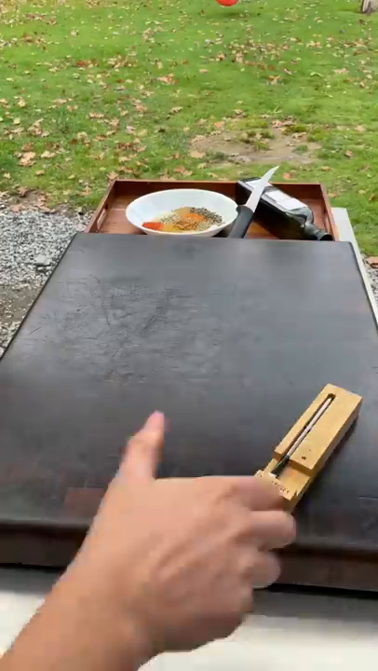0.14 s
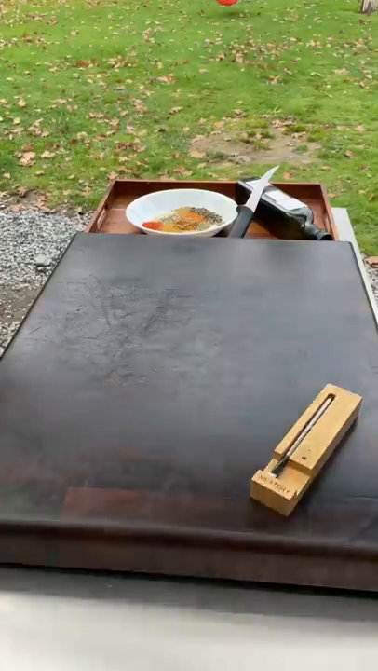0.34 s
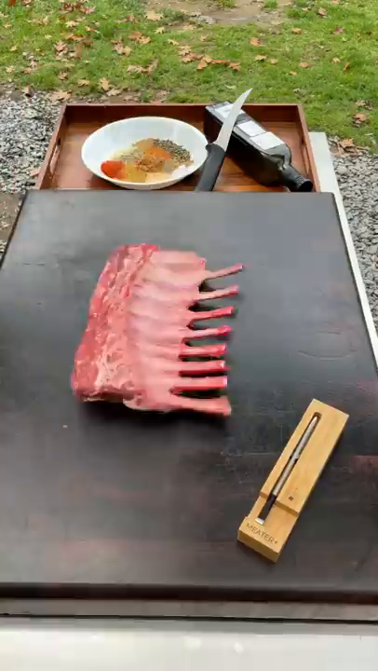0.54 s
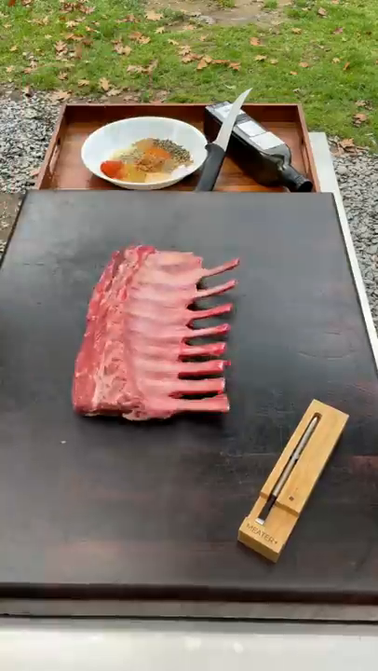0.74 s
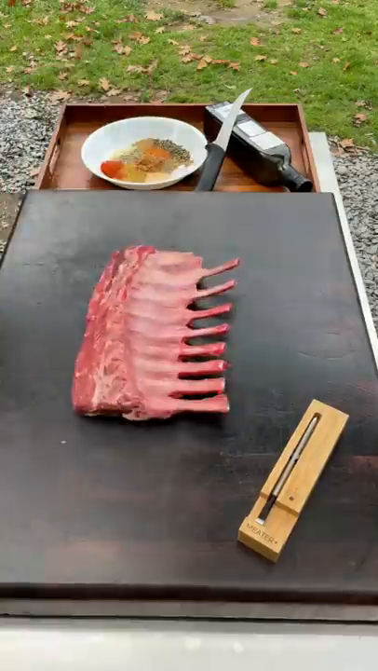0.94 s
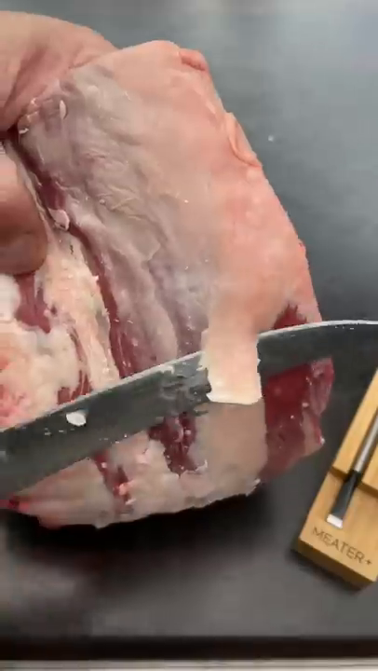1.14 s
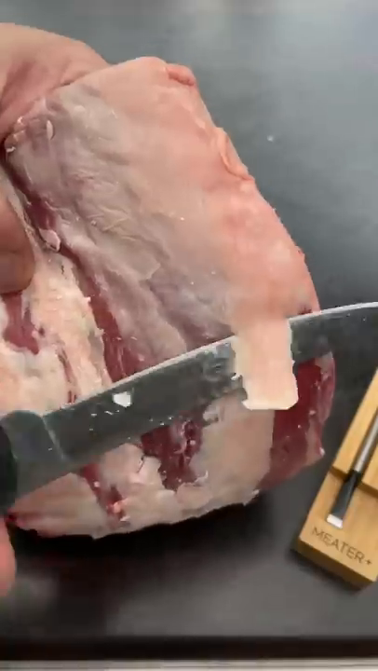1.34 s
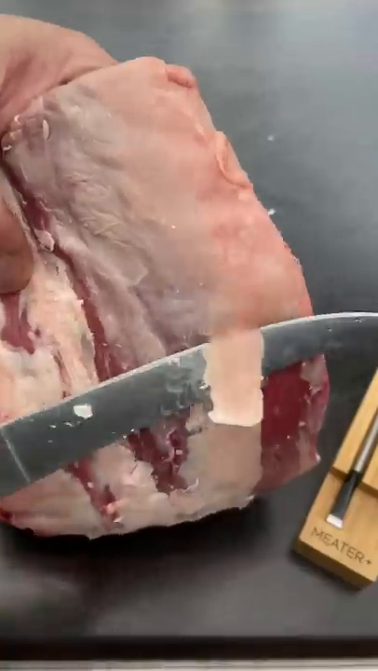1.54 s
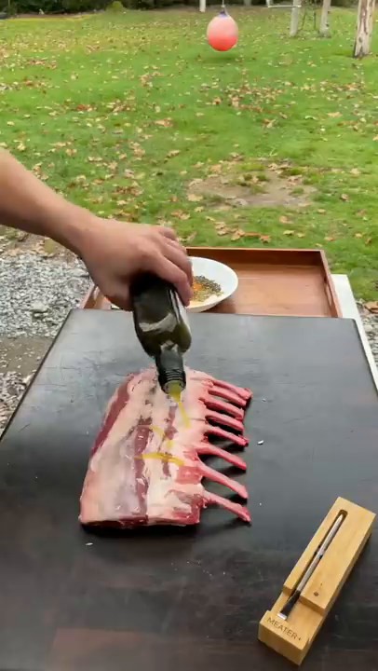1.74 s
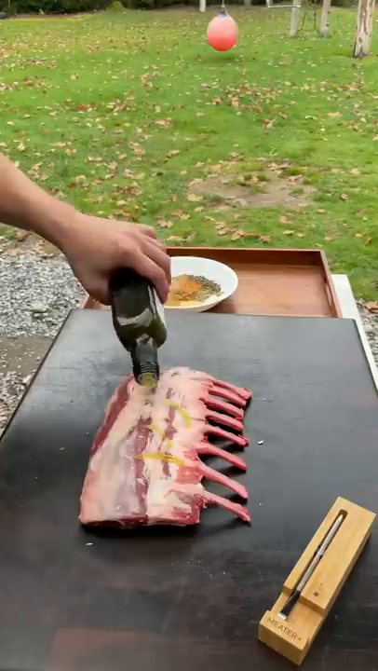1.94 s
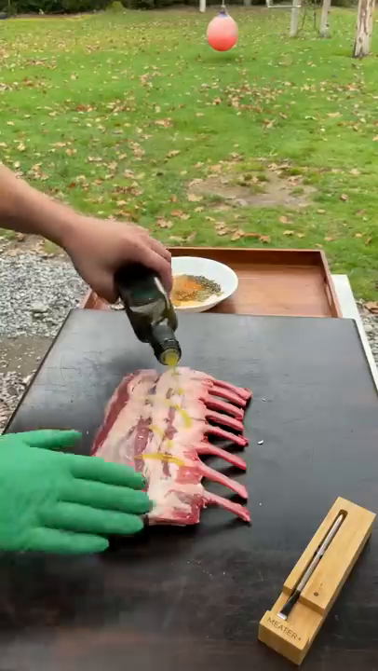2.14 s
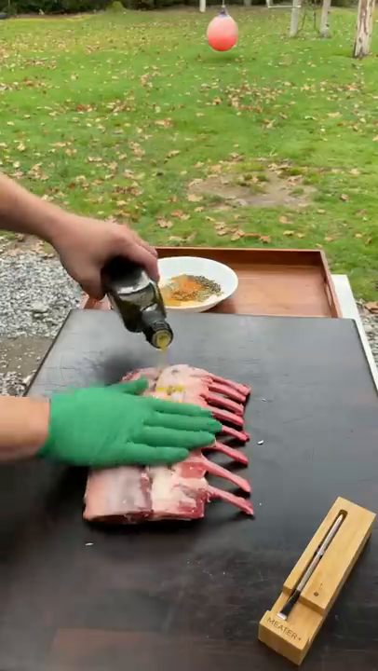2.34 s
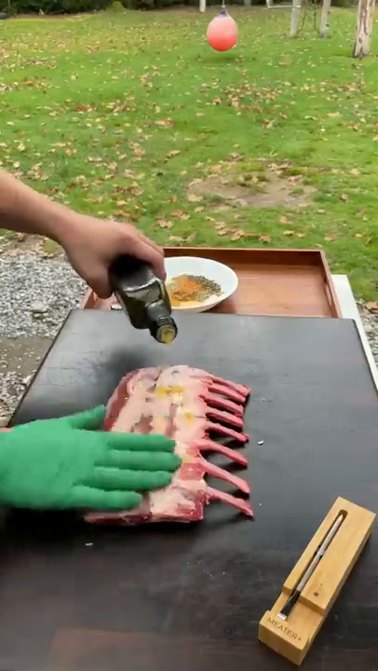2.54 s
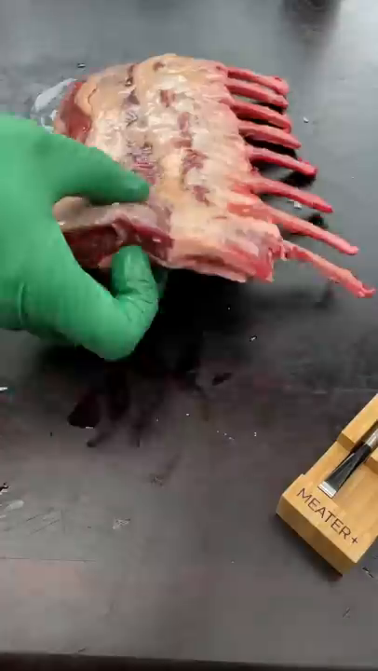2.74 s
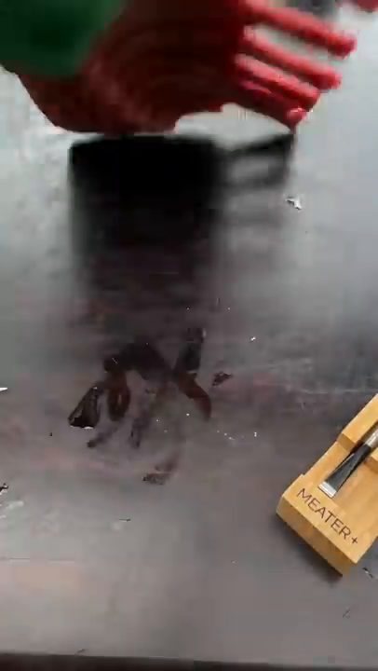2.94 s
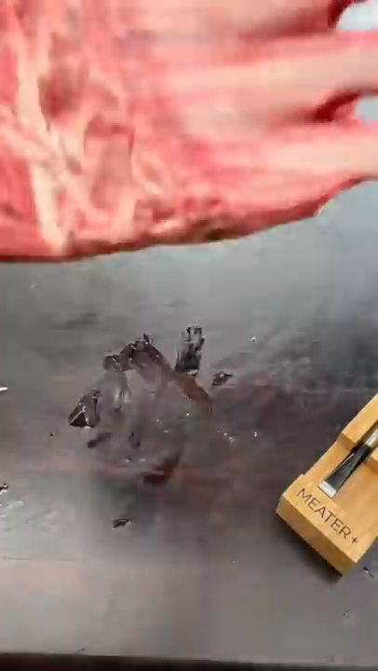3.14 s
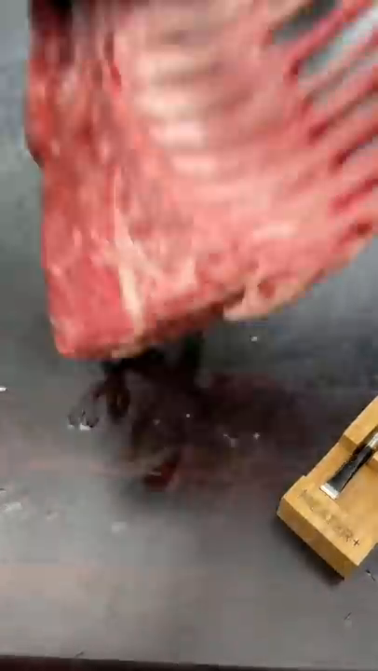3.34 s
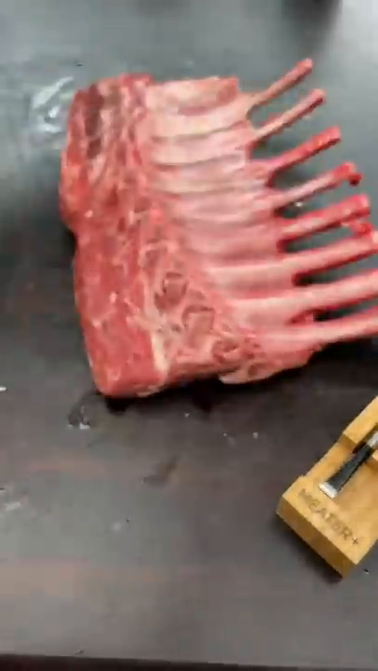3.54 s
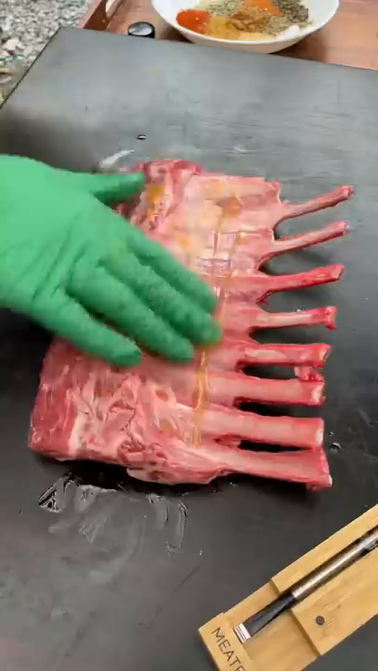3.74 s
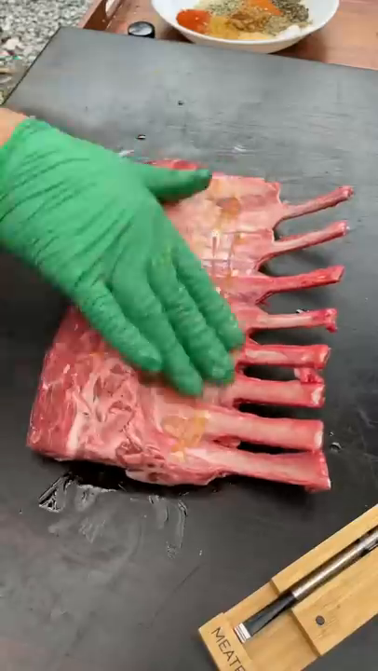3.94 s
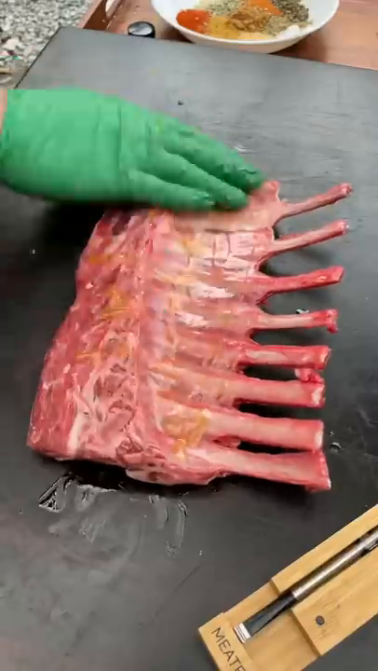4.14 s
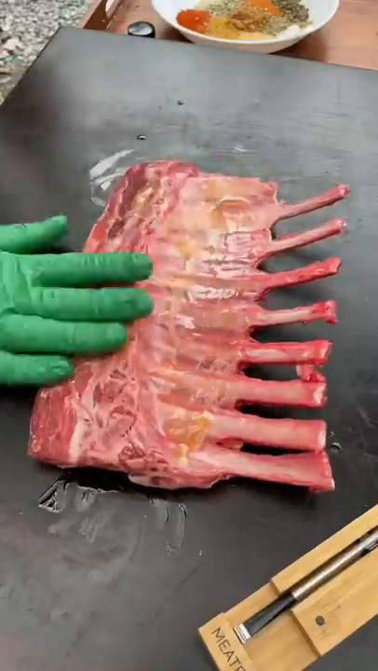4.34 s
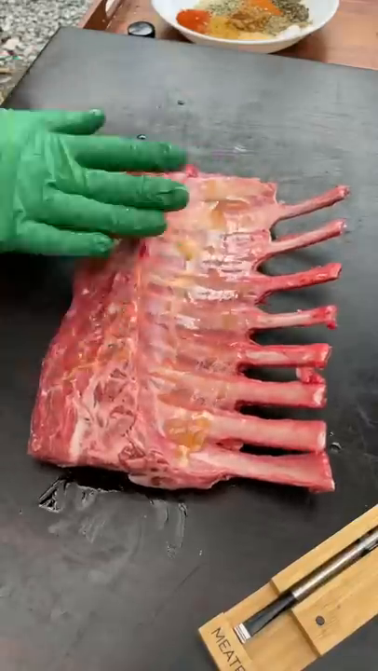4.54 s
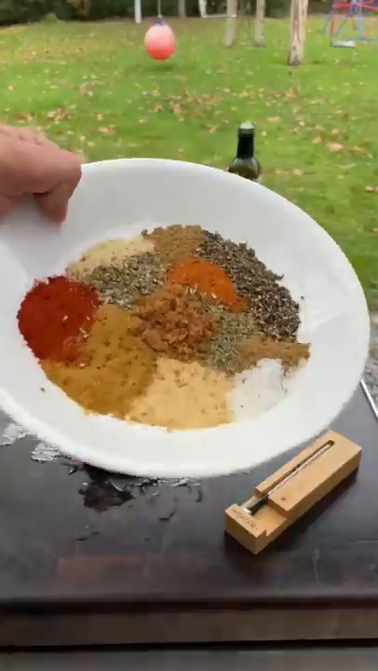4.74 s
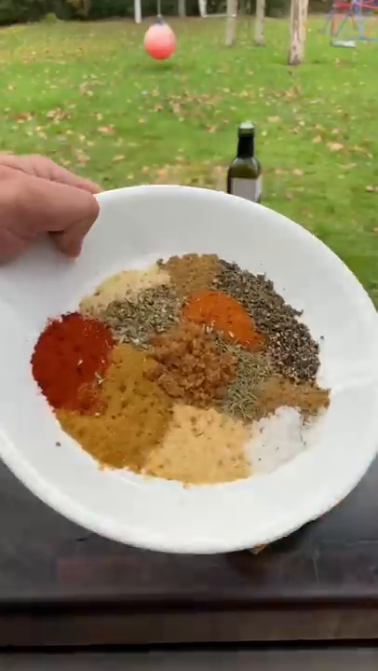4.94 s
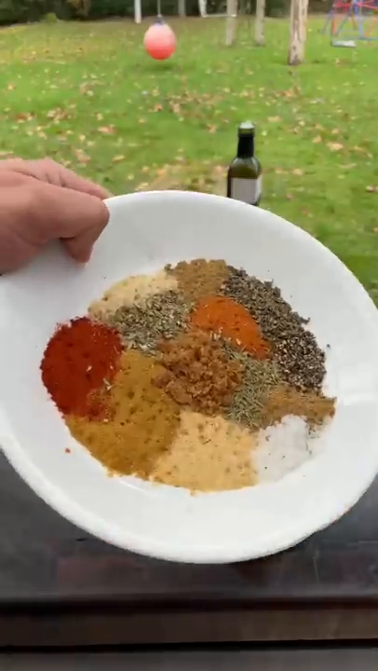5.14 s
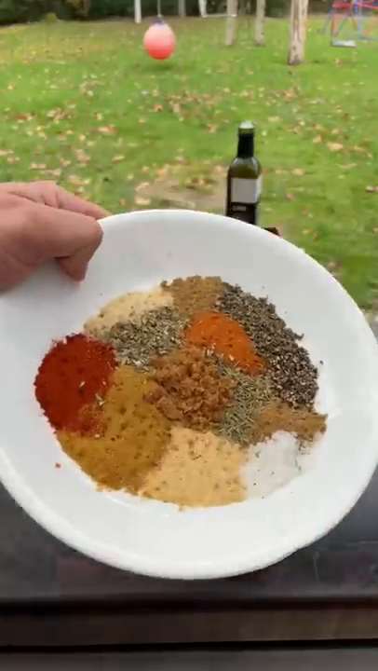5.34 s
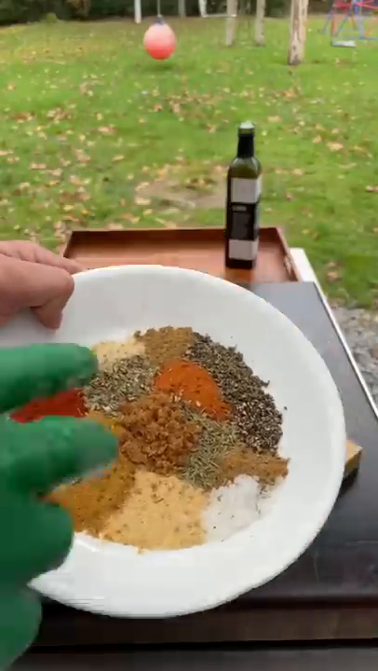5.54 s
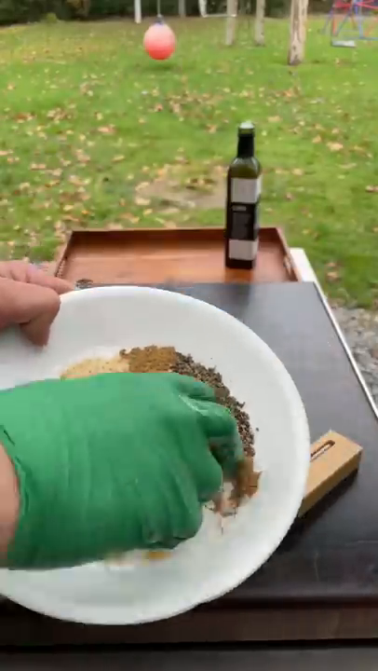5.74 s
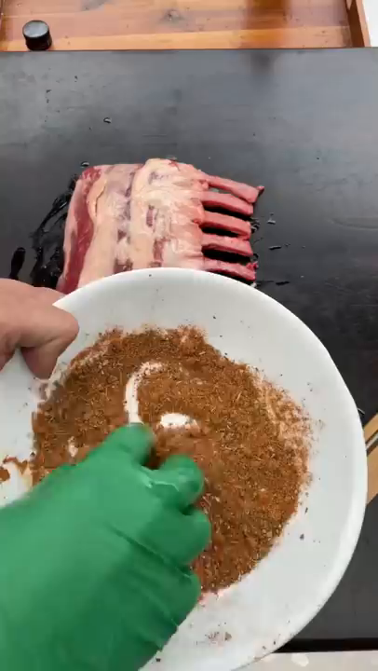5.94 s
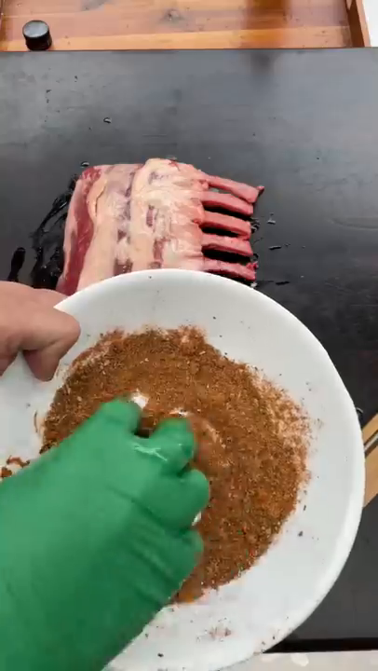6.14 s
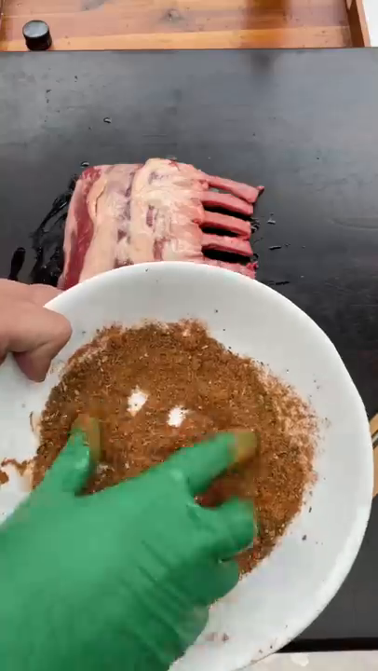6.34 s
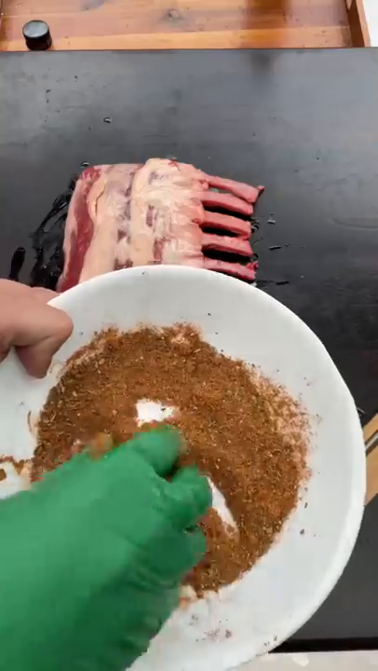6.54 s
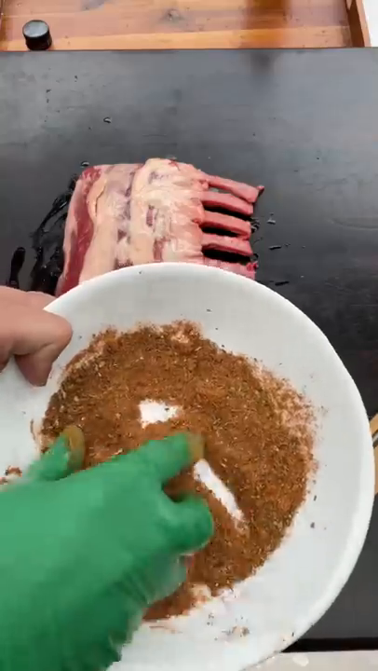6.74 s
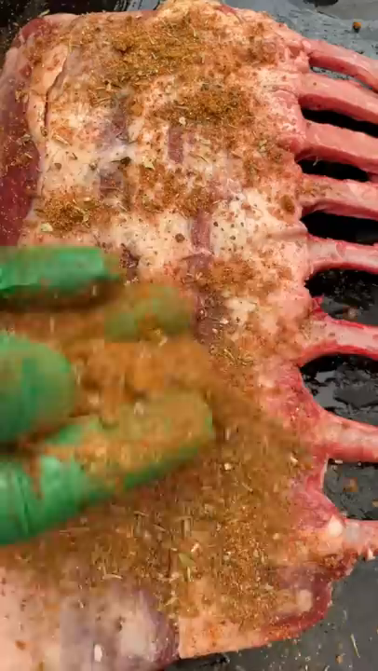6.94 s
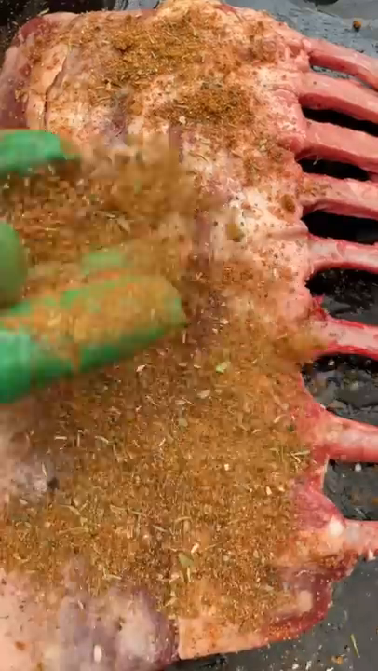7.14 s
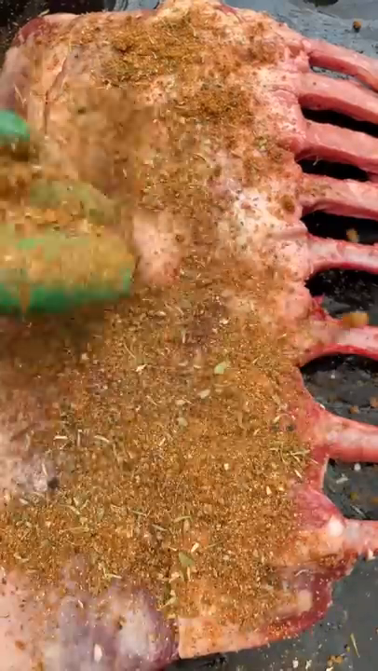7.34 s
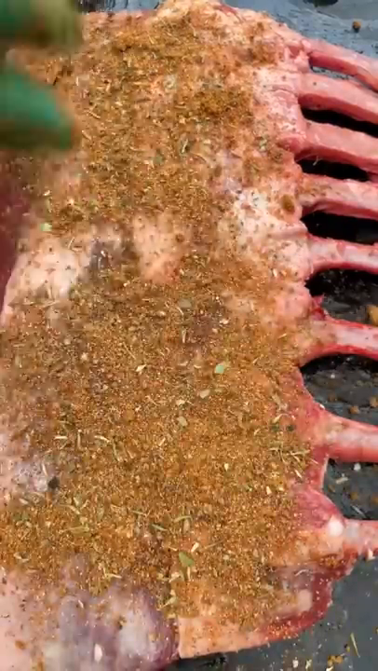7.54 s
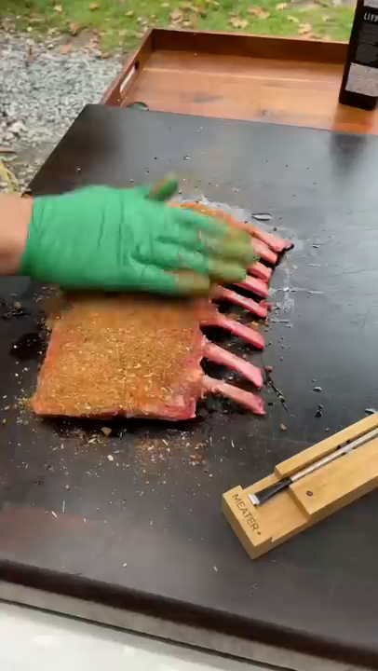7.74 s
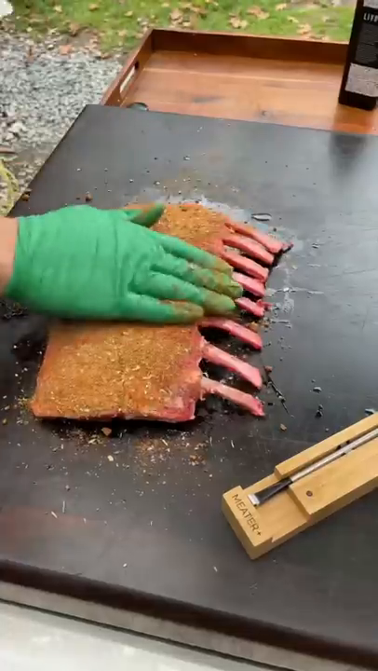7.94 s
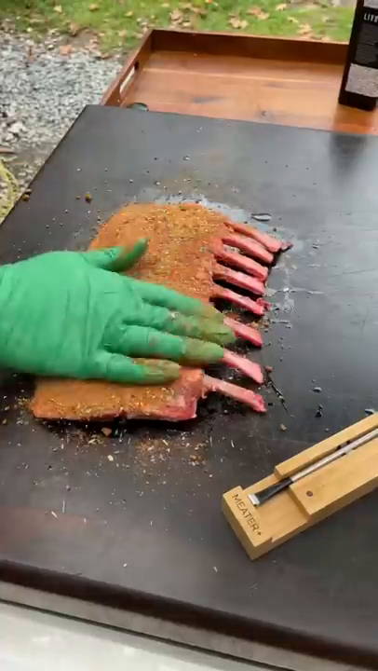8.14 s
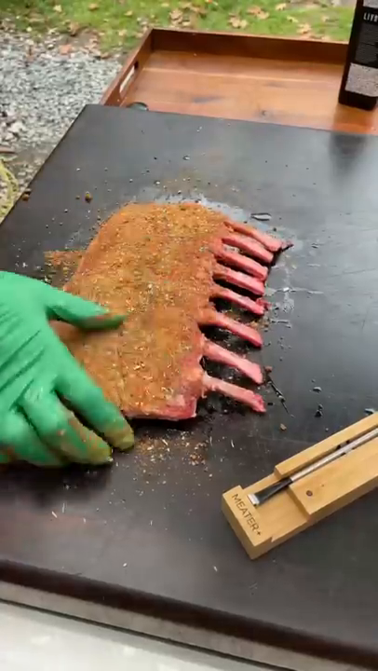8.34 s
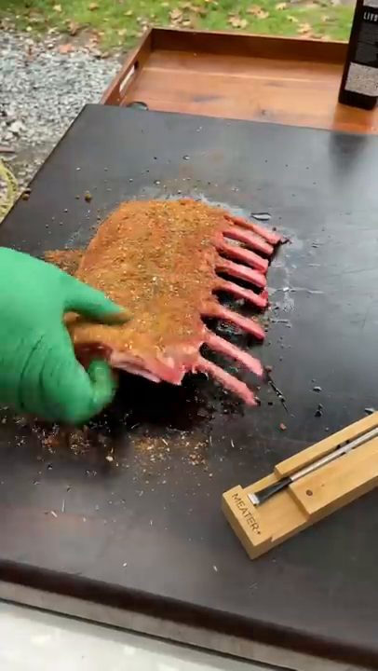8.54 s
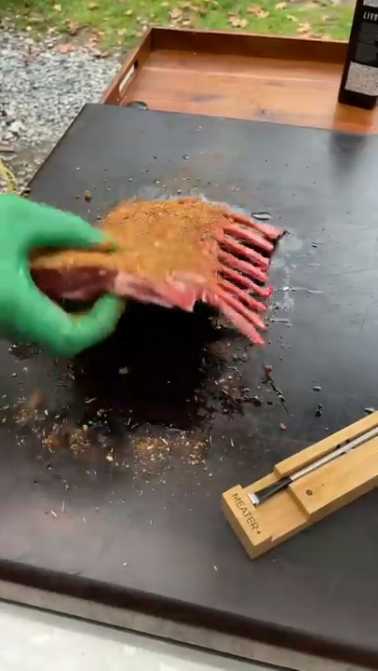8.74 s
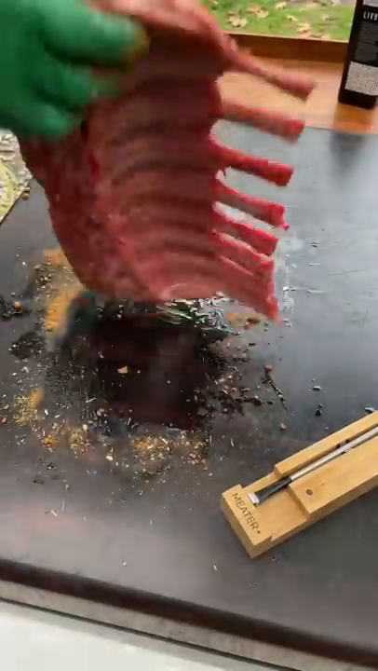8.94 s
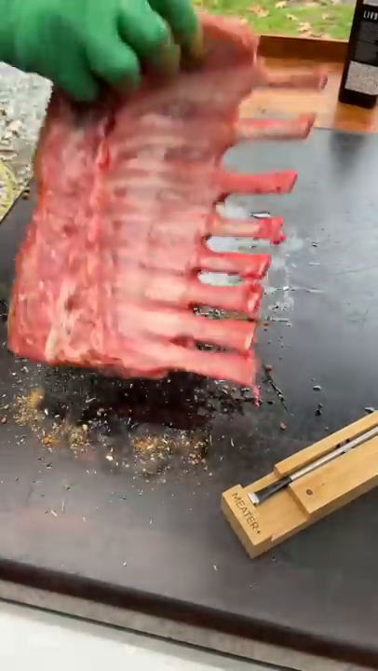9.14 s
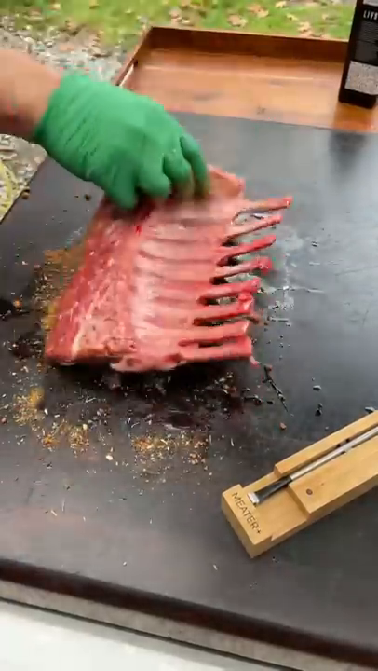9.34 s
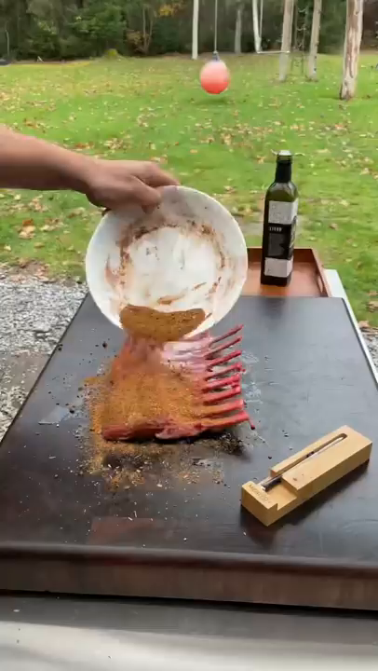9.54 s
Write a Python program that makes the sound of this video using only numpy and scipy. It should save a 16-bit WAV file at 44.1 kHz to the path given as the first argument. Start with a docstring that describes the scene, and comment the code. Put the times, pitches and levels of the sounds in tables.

```python
"""Outdoors, at a heavy wooden board on a steel table, a rack of lamb is seasoned close to two microphone ports.
Meat is slapped down, oiled, peeled off and turned: blows ring the board and table, which rattle and rock.
A gloved hand stirs dry spice in a plate, sprinkles it and pats it in: wet and dry friction is built from tiny
random clicks through resonances and filters, the garden air from shaped noise.
The scene has twelve sections; the background level changes at each, and ringing stops abruptly."""
import sys
import numpy as np
from scipy import signal
from scipy.fft import rfft, irfft, next_fast_len
from scipy.io import wavfile
from scipy.ndimage import uniform_filter1d, map_coordinates

SR = 44100
rng = np.random.default_rng(int(sys.argv[2]) if len(sys.argv) > 2 else 0)


def generate_wav(signal):
    """Clip the signal to [-1, 1] and save it as 16-bit WAV at the path in sys.argv[1]."""
    frames = np.transpose(np.atleast_2d(signal))
    scaled = np.clip(frames, -1, 1) * 32767
    pcm = np.round(scaled).astype(np.int16)
    wavfile.write(sys.argv[1], SR, pcm)


N = 427769
TIME = np.arange(N) / SR
RING_TIME = TIME[:SR // 2]  # single hits last half a second at most
# Table levels are relative: the functions trim them with their own *_db settings.


def undb(db):
    """Decibels to gain."""
    return 10 ** (np.asarray(db) / 20)


def unit(x):
    """Scale to rms 1."""
    return x / np.sqrt(np.mean(x ** 2))


def fade(t, t60):
    """Exponential decay by 60 dB in t60 seconds."""
    return np.exp(-np.log(1000) * t / max(t60, 1e-4))


def convolve(x, response):
    """Filter x, keeping its length."""
    return signal.fftconvolve(x, response)[:len(x)]


def spectrum_at(hz, points):
    """Read (freq_hz, level_db) points on a log-frequency axis."""
    f, db = np.transpose(points)
    return np.interp(np.log(hz + 1), np.log(f), db)


def colour(x, points, size=4096):
    """Causal minimum-phase filter with the given spectrum shape; white noise keeps its power."""
    log_gain = np.log(undb(spectrum_at(np.fft.rfftfreq(size, 1 / SR), points)))
    cepstrum = irfft(log_gain)
    # folding the cepstrum puts the energy as early as possible
    cepstrum[1:size // 2] *= 2
    cepstrum[size // 2 + 1:] = 0
    response = irfft(np.exp(rfft(cepstrum)))
    return convolve(x, response / np.linalg.norm(response))


MOST_CYCLES = 48  # longest t60 of any struck mode, in cycles


def ring(modes, contact_hz=np.inf):
    """Damped modes after one blow; meat and hand cap every decay, and a soft contact weakens high modes."""
    total = 0
    for hz, t60, db in modes:
        gain = undb(db) / (1 + (hz / contact_hz) ** 2)
        decay = fade(RING_TIME, min(t60, MOST_CYCLES / hz))
        total = total + gain * decay * np.sin(2 * np.pi * hz * RING_TIME)
    return total


def burst(points, t60, rise_s=0):
    """A coloured noise burst that swells briefly and dies away."""
    swell = 1 - np.exp(-RING_TIME / max(rise_s, 1e-6))
    noise = rng.standard_normal(len(RING_TIME))
    return colour(noise * swell * fade(RING_TIME, t60), points)


def walk(rate):
    """Smooth random wandering, rms near 1, with about `rate` new values a second."""
    hold = int(SR / rate)
    stairs = np.repeat(rng.standard_normal(N // hold + 1), hold)
    return unit(uniform_filter1d(stairs, hold)[:N])


def grains(per_s, spread_db):
    """Random tiny clicks of uneven size and either sign, rms 1."""
    sizes = undb(spread_db * np.minimum(rng.standard_normal(N), 2.5))
    happens = rng.random(N) < per_s / SR
    return unit(happens * sizes * rng.choice([-1, 1], N))


# when each section of the scene begins: start_s
SECTION_STARTS = [0, .985, 1.63, 2.25, 3.0, 3.638, 4.66, 5.36, 5.96, 6.885, 7.685, 9.55]


def section_end(s):
    """When the section that contains time s ends."""
    return min([start for start in SECTION_STARTS if start > s] + [N / SR])


def add(out, start_s, sound):
    """Mix a sound in; it stops when the next section begins."""
    first = max(int(start_s * SR), 0)
    count = min(len(sound), int(section_end(start_s) * SR) - first, N - first)
    out[first:first + count] += sound[:count]


def strokes(rows, attack_s, release_t60, axis=2):
    """Gain of a series of strokes: each swells, holds until its length is up and dies away; powers add."""
    power, t = np.zeros(N), TIME[:SR]
    for row in rows:
        start_s, length_s = row[:2]
        shape = np.minimum(t / attack_s, 1) * fade(np.maximum(t - length_s, 0), release_t60)
        add(power, start_s, (undb(row[axis]) * shape) ** 2)
    return np.sqrt(power)


def glide(x, ratio):
    """Shift all resonances of a steady texture by a moving frequency ratio, by reading it at varying speed."""
    return map_coordinates(x, [np.cumsum(ratio) % (N - 1)], order=1)


def pitch_path(rows):
    """Pitch over time for strokes whose last two columns are from_hz and to_hz."""
    path = []
    for s, length_s, *_, from_hz, to_hz in rows:
        path += [(s, from_hz), (s + length_s, to_hz)]
    return np.interp(TIME, *np.transpose(sorted(path)))


# the two microphone ports: freq_hz, left_lead_rad
PORT_PHASE = [(0, 0), (1000, -.2), (2700, .4), (5300, 0), (6500, .9), (8350, 2.7), (10300, 3.14),
              (12000, 4.1), (14000, 5.9), (16000, 6.28)]
# the same ports: freq_hz, left_minus_right_db
PORT_BALANCE = [(60, 0.4), (250, 1.5), (500, 5.5), (1000, 3), (2000, 0), (4000, 0), (10000, -0.5)]


def ports(x):
    """Spread a mono sound over two microphone ports that differ in phase and level."""
    size = next_fast_len(N + SR)
    hz = np.fft.rfftfreq(size, 1 / SR)
    lead = np.exp(1j * np.interp(hz, *np.transpose(PORT_PHASE)))
    tilt = undb(spectrum_at(hz, PORT_BALANCE) / 2)
    return irfft(rfft(x, size) * np.array([lead * tilt, 1 / tilt]), size)[:, :N]


# background in each section: air_db, hiss_db
SECTION_LEVELS = [(-61.5, -80), (-63, -63.5), (-60, -65), (-62.5, -72.5), (-69.5, -87), (-68.5, -82),
                  (-73, -88), (-68, -73.5), (-70.5, -78), (-73.5, -88), (-66.5, -78.5), (-76.5, -88)]
# colour of the garden air: freq_hz, level_db
AIR = [(25, -11), (60, 6), (120, -0.5), (300, -8), (700, -15), (1200, -20.5), (3000, -29.5), (8000, -50.5),
       (16000, -57.5)]
# colour of the soft hiss: freq_hz, level_db
HISS = [(200, -16.5), (900, -3), (1500, -6), (2500, -0.5), (4500, -4.5), (7000, -4), (12000, -6.5),
        (16000, -17.5)]
# colour of what differs between the ports: freq_hz, level_db
NEARBY = [(40, -24), (200, -4), (650, 6), (1800, -1.5), (3200, -1), (7000, -6.5), (10000, -15.5),
          (13000, -12), (16000, -16)]
HUM_HZ, HUM_DB, HUM_STOPS_S = 57.5, -57.5, 3.638


def outdoors(apart_db=-3, waver_db=1):
    """Garden air and soft hiss as noise, levelled per section; a low, drifting hum under the first sections."""
    section = np.searchsorted(SECTION_STARTS, TIME, side="right") - 1
    air_gain, hiss_gain = (uniform_filter1d(undb(db)[section], size=512) for db in np.transpose(SECTION_LEVELS))
    hum_phase = 2 * np.pi * np.cumsum(HUM_HZ + .5 * walk(rate=9.1)) / SR
    hum = undb(HUM_DB) * (TIME < HUM_STOPS_S) * np.sqrt(2) * np.sin(hum_phase)

    def background():
        """One independent draw of air and hiss."""
        air = air_gain * colour(rng.standard_normal(N), AIR)
        return air + hiss_gain * colour(rng.standard_normal(N), HISS)

    shared, left, right = (background() for _ in range(3))
    apart = np.array([colour(left, NEARBY), colour(right, NEARBY)])
    waver = undb(waver_db * walk(rate=10.0))
    return hum + (ports(shared) + undb(apart_db) * apart) * waver


# meat or hand strikes the board: start_s, knock_db, boom_db, smack_db, thud_db
BLOWS = [(0.001, -33.5, -40, -28.5, -44), (0.41, -55, -43.5, -87, -56), (0.5141, -14, -29, -17.5, -22),
         (0.5197, -9, -36, -31, -13.5), (0.5409, -2, -23.5, -21, -20.5), (0.577, -22, -50, -44, -21.5),
         (0.593, -36, -19, -48, -45), (0.625, -37, -36.5, -60, -30.5), (3.408, -17, -28.5, -15, -20),
         (3.43, -28, -41, -26, -25), (3.466, -24, -27, -38, -22.5), (3.517, -37, -33, -49, -33),
         (3.568, -33, -29.5, -48, -31.5), (4.568, -65, -50, -94, -62), (5.36, -69, -55.5, -85, -68.5),
         (7.7877, -56.5, -56.5, -36, -51.5), (7.792, -41.5, -46, -35, -36.5), (7.842, -66, -41, -37, -54),
         (8.069, -57.5, -55, -34, -54), (8.076, -54, -44, -36.5, -47), (9.249, -29.5, -51.5, -50, -59),
         (9.422, -44, -60, -53, -60)]
# modes of the board: freq_hz, t60_s (before the cap), level_db
BOARD = [(249, .08, -19.5), (366, 0.19, -16.5), (441, 0.14, -13.5), (511, 0.1, -15.5), (670.4, 0.049, -0.5),
         (725, 0.05, -15), (915, .1, -16.5), (1163, 0.05, -9.5), (1210, 0.04, -5.5), (1297, 0.03, -13.5),
         (1657, 0.034, -13.5), (1965, 0.035, -5), (2040, 0.024, -7), (2420, 0.02, -15), (3000, 0.02, -13.5)]
# modes of the table under it: freq_hz, t60_s (before the cap), level_db
TABLE = [(57, 0.63, -11.5), (81.4, 0.22, -2), (90, 0.19, -1), (142.6, 0.13, -2.5), (236.4, 0.44, -10)]
# colour of the wet smack: freq_hz, level_db
SMACK = [(200, -13), (1200, 0.5), (2000, 5), (3000, 1.5), (5000, -5), (6500, -4), (12000, -5.5),
         (16000, -20)]
# colour of the fleshy thud: freq_hz, level_db
FLESH = [(60, -10.5), (130, -4.5), (240, 0), (470, 1.5), (700, 0.5), (950, 0), (1600, -10), (3000, -23.5),
         (8000, -42.5)]


def blows(knock_db=0, boom_db=2, smack_db=9, smack_t60=0.017, spread_at_0db_s=0.00037, slowing=0.39,
          thud_db=0, thud_t60=0.092, push_s=.005, contact_hz=2100, build_s=0.0015):
    """Blows smack wetly as contact spreads, thud in flesh, build up the board's ring and, slower, a table boom."""
    out = np.zeros(N)
    boom = ring(TABLE) * (1 - np.exp(-RING_TIME / push_s))
    for s, knock, low, smack, thud in BLOWS:
        spread_s = spread_at_0db_s * undb(-slowing * knock)  # a gentle blow flattens the meat more slowly
        wood = ring(BOARD, contact_hz) * (1 - np.exp(-RING_TIME / (spread_s + build_s)))
        wood = wood / np.abs(wood).max()
        wet = undb(smack + smack_db) * burst(SMACK, smack_t60, spread_s)
        flesh = undb(thud + thud_db) * burst(FLESH, thud_t60, build_s)
        add(out, s, undb(knock + knock_db) * wood + undb(low + boom_db) * boom + wet + flesh)
    return out


# loose things shake: start_s, clatter_db, clatter_t60_s, jingle_db, jingle_t60_s, board_ring_db
SHAKES = [(.001, -46, 0.23, -39, 0.29, -45), (.517, -26, 0.85, -34, 0.33, -32.5),
          (3.409, -27, 1.6, -39, 0.34, -36.5), (7.792, -47.5, 0.38, -61, 0.52, -60),
          (8.075, -50.5, 0.41, -63.5, 0.24, -54.5), (9.251, -53.5, 0.36, -63.5, 1, -52.5)]
# colour of the clatter: freq_hz, level_db
CLATTER = [(30, -18), (80, 3), (150, 3), (240, 3.5), (320, 1), (450, 3), (700, -2), (1000, -3.5),
           (1600, -14.5), (2100, -20.5), (3200, -30.5), (8000, -42)]
# colour of the jingling utensils: freq_hz, level_db
JINGLE = [(300, -16.5), (1200, -3), (2300, 2.5), (3500, -1), (5000, -5.5), (7000, -6), (12000, -19),
          (16000, -24)]


def shakes(contact_hz=900, rise_s=0.0052, linger=1.1):
    """After a heavy blow the board chatters on the steel table and rings on; the utensils on it jingle."""
    out = np.zeros(N)
    board = ring(BOARD, contact_hz)
    board = board / np.linalg.norm(board)
    for s, clatter_db, clatter_t60, jingle_db, jingle_t60, wood_db in SHAKES:
        shaking = rng.standard_normal(len(RING_TIME)) * fade(RING_TIME, linger * clatter_t60)
        chatter = undb(wood_db) * convolve(shaking, board)
        clatter = undb(clatter_db) * burst(CLATTER, clatter_t60, rise_s)
        jingle = undb(jingle_db) * burst(JINGLE, jingle_t60, rise_s)
        add(out, s, clatter + chatter + jingle)
    return out


# sharp clicks and snaps, most of them sticky glove on oily meat:
# start_s, level_db, pitch_hz, falloff_db_per_octave
SNAPS = [(.132, -42.5, 2000, 16), (2.694, -34.5, 3900, -4), (2.718, -41, 3700, 6), (2.831, -44, 12500, 8),
         (2.872, -47.5, 11000, 8.5), (3.059, -52.5, 13000, 6.5), (3.2524, -44.5, 6340, 4),
         (3.33, -35.5, 6090, 14), (3.353, -39.5, 6560, 3), (3.802, -35.5, 2850, 18.5),
         (3.822, -45.5, 2720, 15), (4.342, -9.5, 3810, 1), (4.3498, -9, 3355, 3), (4.4222, -19, 7130, 2),
         (4.4301, -20.5, 5970, -0.5), (6.275, -36, 6900, 0), (6.4322, -34, 2620, 4), (6.7862, -35, 5900, 5),
         (7.362, -52, 6230, 4.5), (7.438, -48.5, 6270, 9), (7.455, -48, 6840, 13), (8.332, -32.5, 6310, 5),
         (8.715, -35.5, 2627, -0.5), (8.733, -37.5, 3000, 7), (8.767, -35, 6000, -3),
         (8.7902, -27, 3200, -0.5), (8.808, -32, 2937, 6.5), (9.3232, -49, 2730, 18)]
# colour of a snap: freq_hz, level_db
SNAP = [(150, -40), (700, -4), (1600, -9), (3500, 0.5), (4700, -3.5), (7000, 3.5), (12000, 4), (16000, -5)]


def snaps(snap_db=4, pocket_db=-14, pocket_t60=0.005, tear_db=-19, tear_t60=0.013,
          spatter_db=-36, spatter_t60=0.034):
    """One sharp crack, mostly a sticky film letting go; a tiny air pocket rings, edges tear and spatter."""
    out = np.zeros(N)
    click = 1. * (RING_TIME == 0)
    for s, db, hz, falloff in SNAPS:
        tone = [(f, level - falloff * abs(np.log2(f / hz))) for f, level in SNAP]
        crack = colour(click, tone)
        crack = crack / np.abs(crack).max()
        pocket = ring([(hz, pocket_t60, pocket_db)])
        after = undb(tear_db) * burst(tone, tear_t60) + undb(spatter_db) * burst(tone, spatter_t60)
        add(out, s, undb(db + snap_db) * (crack + pocket + after))
    return out


# light fingertip and bone taps: start_s, level_db, pitch_hz
TAPS = [(0.132, -46, 1280), (6.227, -58, 1100), (6.4047, -55, 1050), (6.561, -64.5, 1500),
        (6.587, -50.5, 1355), (7.207, -52.5, 1070), (7.262, -63, 1250), (7.438, -54, 1000),
        (7.857, -30.5, 1440), (8.47, -52.5, 943.4), (9.1114, -49.5, 1224)]
# colour of soft wet contact: freq_hz, level_db
SQUELCH = [(150, -25), (350, 13.5), (520, -22), (800, 18.5), (1300, -4), (2200, 0), (3200, -16),
           (8000, -30)]


def taps(tap_db=-1, wood_db=-9, pad_db=-10, pad_t60=0.088):
    """Small hollow taps: a short ringing pop, the dull pad of the finger, and a little of the board."""
    out = np.zeros(N)
    for s, db, hz in TAPS:
        pop = ring([(hz, .018, 0)])
        pad = undb(pad_db) * burst(SQUELCH, pad_t60)
        add(out, s, undb(db + tap_db) * (pop + pad + undb(wood_db) * ring(BOARD)))
    return out


# board rocks after a heavy slap, about twenty knocks a second:
# start_s, knock_db, boom_db, rattle_db, board_hz (main resonance, before its random stray)
ROCKING = [(0.643, -29.5, -39, -32, 660), (0.693, -27, -31, -38, 660), (0.741, -27.5, -30, -33, 660),
           (0.788, -27, -31, -33, 660), (0.837, -28, -39.5, -35.5, 660), (0.886, -33, -40, -41.5, 660),
           (3.485, -18.5, -21.5, -34.5, 614), (3.535, -22.5, -23, -29, 625),
           (3.584, -16.5, -23.5, -28, 616), (3.634, -24, -29, -30.5, 630)]
# modes of the board while lifted off the table, ringing longer: freq_hz, t60_s (before the cap), level_db
FREE_BOARD = [(660, 0.1, 0), (402, 0.1, -7), (490, .1, -10.5), (697, 0.047, -6), (879, .09, -2.5),
              (1114, 0.046, -8.5), (1525, 0.045, -8.5), (1925, .025, -12), (2118, .022, -4)]
# colour of each knock's rattle: freq_hz, level_db
RATTLE = [(200, -3.5), (850, 4.5), (1500, -4), (2200, 0), (3000, -10), (5000, -16.5), (6300, -12),
          (8500, -12), (13000, -23), (16000, -36)]


def rocking(knock_db=-2, boom_db=2, rattle_db=-1, rattle_t60=0.038, rise_s=.0005, push_s=0.0054,
            tail_db=-13, tail_t60=0.3, build_s=0.0025, stray=0.029):
    """Knocks land on slightly different spots: each rings the board, booms in the table and rattles briefly."""
    out = np.zeros(N)
    boom = ring(TABLE) * (1 - np.exp(-RING_TIME / push_s))
    for s, knock, low, rattle, board_hz in ROCKING:
        ratios = board_hz / FREE_BOARD[0][0] * (1 + stray * rng.standard_normal(len(FREE_BOARD)))
        modes = [(hz * ratio, t60, db) for (hz, t60, db), ratio in zip(FREE_BOARD, ratios)]
        wood = ring(modes) * (1 - np.exp(-RING_TIME / build_s))
        wood = undb(knock + knock_db) * wood / np.abs(wood).max()
        loose = burst(RATTLE, rattle_t60, rise_s) + undb(tail_db) * burst(RATTLE, tail_t60, rise_s)
        add(out, s, wood + undb(low + boom_db) * boom + undb(rattle + rattle_db) * loose)
    return out


# wipes of the glove through the oil: start_s, length_s, wet_db, board_db
WIPES = [(2.26, 0.13, -63.5, -54.5), (2.545, 0.023, -63.5, -73), (2.675, 0.047, -62.5, -70),
         (2.895, 0.048, -58.5, -71), (3.27, 0.17, -69.5, -86), (3.64, 0.48, -66.5, -67),
         (3.765, 0.08, -62, -57.5), (4.15, 0.134, -68.5, -71.5), (4.255, 0.23, -62, -67.5),
         (4.29, .05, -55.5, -62), (4.325, 0.043, -62, -53), (4.44, 0.078, -71.5, -74.5),
         (8.78, 0.07, -66, -70)]
# colour of crackling oil: freq_hz, level_db
OIL = [(300, -20.5), (1500, -3.5), (3200, 0), (5000, -4.5), (7500, -1.5), (12000, -3.5), (16000, -14)]


def smear(wet_db=1, wood_db=-4, contact_hz=1800):
    """Oil crackles in fine dense clicks under the glove; the board sounds dully through the meat."""
    wet = colour(grains(per_s=13000, spread_db=9.0), OIL)
    wood = unit(convolve(grains(per_s=2400, spread_db=1.5), ring(BOARD, contact_hz)))
    wet_gain, wood_gain = (strokes(WIPES, attack_s=0.0089, release_t60=0.052, axis=2 + k) for k in range(2))
    return undb(wet_db) * wet_gain * wet + undb(wood_db) * wood_gain * wood


# pulls that peel the sticky meat off; the squelch rises as the gap closes in on the last contact:
# start_s, length_s, board_db, squelch_db, from_hz, to_hz
PULLS = [(2.678, 0.047, -48, -52.5, 705, 980), (2.728, 0.057, -43, -46, 755, 1030),
         (2.785, 0.035, -43, -66, 695.6, 1070), (2.88, 0.051, -41.5, -52, 746, 1000),
         (8.57, 0.085, -51.5, -58.5, 701, 1150), (8.731, 0.075, -53.5, -56, 681.6, 880),
         (8.803, 0.058, -50, -52, 1045, 1600), (9.395, 0.0293, -56, -62.5, 1312, 1500)]
# resonances left to the board while meat drags on it: freq_hz, t60_s (before the cap), level_db
PRESSED_BOARD = [(389, 0.15, -16.5), (516, 0.1, -5.5), (687, 0.086, 8.5), (860, 0.063, -9), (1232, 0.05, 0),
                 (1440, 0.03, -32), (1696, 0.041, -13.5), (1963, 0.026, -12.5), (2800, .012, -21)]
# air gap under the peeling meat, before its glide: freq_hz, t60_s, level_db
GAP = [(1000, 0.012, 9), (1500, 0.0096, 3.5), (2130, .006, -5)]


def peel(hollow_db=0, body_db=-13, squelch_db=-1, uneven_db=1, film_db=-27):
    """Meat slips free in tiny jerks: the wood rings hollow, the gap squelches upward, threads of oil snap."""
    slips = unit(grains(per_s=2500, spread_db=-1.5) * undb(uneven_db * walk(rate=82)))
    hollow = unit(convolve(slips, ring(PRESSED_BOARD)))
    body = colour(slips, SQUELCH)
    film = colour(grains(per_s=140, spread_db=8), SNAP)
    board = undb(hollow_db) * hollow + undb(body_db) * body + undb(film_db) * film
    gap = unit(convolve(grains(per_s=3000, spread_db=1), ring(GAP)))
    squelch = glide(gap, pitch_path(PULLS) / GAP[0][0])
    board_gain, squelch_gain = (strokes(PULLS, attack_s=0.015, release_t60=0.12, axis=2 + k) for k in range(2))
    return board_gain * board + undb(squelch_db) * squelch_gain * squelch


# the table's fading ring: freq_hz, t60_s, level_db
RING_OUT = [(142, .5, -51), (1020, 0.25, -63), (2010, 0.27, -64)]
RING_OUT_S = 3.642


def ring_out():
    """The table is still ringing faintly, in a few decaying sines, as the second oiling begins."""
    out = np.zeros(N)
    for hz, t60, db in RING_OUT:
        add(out, RING_OUT_S, undb(db) * fade(RING_TIME, t60) * np.sin(2 * np.pi * hz * RING_TIME))
    return out


# the glove slides on the oiled meat: start_s, length_s, level_db, from_hz, to_hz
SWISHES = [(3.745, 0.0298, -61.5, 2610, 3000), (4.02, 0.081, -67.5, 2900, 2230),
           (4.24, 0.093, -62.5, 2190, 3800), (4.295, .045, -59.5, 3100, 3200),
           (4.36, 0.053, -60, 4000, 5200)]
# resonance of the oil gap, before its glide: freq_hz, t60_s, level_db
OIL_GAP = [(3000, 0.0025, 0)]


def swish(swish_db=0):
    """Oil squeezed out from under the sliding glove swishes; the pitch glides with the gap."""
    film = unit(convolve(grains(per_s=2000, spread_db=-1.5), ring(OIL_GAP)))
    gain = strokes(SWISHES, attack_s=0.015, release_t60=0.078)
    return undb(swish_db) * gain * glide(film, pitch_path(SWISHES) / OIL_GAP[0][0])


# the working hand leans on the table: start_s, length_s, level_db
LEANS = [(3.77, 0.072, -54.5), (4.015, 0.07, -58), (4.29, 0.06, -56.5), (6.265, 0.028, -56.5),
         (6.89, 0.17, -65), (7.79, 0.069, -42), (7.9, 0.468, -53.5), (8.07, 0.098, -40),
         (9.265, 0.049, -50.5), (9.44, 0.075, -61)]
# colour of the rumble: freq_hz, level_db
RUMBLE = [(25, -33.5), (45, 2), (80, 9.5), (160, -12), (300, -12), (700, -41.5), (2000, -59)]


def lean(rumble_db=-3):
    """The table rumbles under the working hand: low coloured noise."""
    gain = strokes(LEANS, attack_s=0.013, release_t60=0.23)
    return undb(rumble_db) * gain * colour(rng.standard_normal(N), RUMBLE)


# the hand brushes the rim of the lifted plate: start_s, length_s, level_db
BRUSHES = [(4.868, 0.037, -70), (5.05, 0.018, -80)]
# colour of skin on glaze: freq_hz, level_db
BRUSH = [(300, -17), (1500, 3), (2200, 6), (2800, -2.5), (3700, 4.5), (4900, -2.5), (7000, -20),
         (16000, -35)]


def brush(brush_db=0):
    """Skin slides softly on the glaze in small even clicks."""
    gain = strokes(BRUSHES, attack_s=0.017, release_t60=0.21)
    return undb(brush_db) * gain * colour(grains(per_s=2300, spread_db=0), BRUSH)


# soft rustles: a hiss swelling before the stirring, then spice rubbed on meat: start_s, length_s, level_db
RUSTLES = [(5.38, 0.28, -85), (5.45, .22, -78.5), (5.51, 0.14, -76), (7.87, .1, -72.5), (8.065, 0.27, -69),
           (8.325, 0.087, -54), (8.41, 0.098, -59.5), (8.47, 0.06, -55), (8.51, 0.051, -51.5),
           (8.56, 0.37, -67), (8.93, .3, -76.5), (9.25, 0.17, -65.5)]
# colour of the rustle: freq_hz, level_db
RUSTLE = [(150, -45), (650, 1.5), (1300, 1.5), (2800, 4), (5000, 1), (7500, 6), (12000, 2), (14000, 4),
          (16000, -13)]


def rustle(rustle_db=2.0, uneven_db=2.0):
    """Soft uneven rustling from dense tiny clicks: first a swelling hiss, later dry grains on soft meat."""
    clicks = unit(grains(per_s=5200, spread_db=3.5) * undb(uneven_db * walk(rate=64)))
    gain = strokes(RUSTLES, attack_s=0.011, release_t60=0.1)
    return undb(rustle_db) * gain * colour(clicks, RUSTLE)


# turns of the fingers through the spice: start_s, length_s, hiss_db, plate_low_db, plate_high_db, scrape_db
STIRS = [(5.668, 0.025, -54.5, -89, -75, -71), (5.748, 0.15, -56, -65, -55, -80),
         (5.84, 0.024, -61, -68, -56, -74), (5.92, 0.055, -68, -75, -65.5, -76),
         (5.961, 0.016, -65, -71, -67, -77), (5.985, 0.091, -59.5, -60.5, -63.5, -78),
         (6.035, 0.018, -54.5, -60, -54, -70), (6.095, 0.031, -59, -67, -66, -76),
         (6.3, 0.067, -53.5, -74, -71, -63), (6.375, 0.032, -59.5, -61.5, -62, -58),
         (6.422, 0.017, -54.5, -61, -60, -63), (6.45, 0.043, -66.5, -77, -71, -72),
         (6.608, 0.029, -57, -72, -70, -62.5), (6.64, 0.22, -59, -82, -76, -64),
         (6.727, 0.025, -53, -58, -73, -55.5), (6.78, 0.019, -64.5, -65, -69, -61)]
# colour of hissing spice grains: freq_hz, level_db
SPICE = [(150, -44), (600, -8), (1600, -5.5), (2800, 5.5), (5000, 4.5), (7500, 7.5), (12000, 1.5),
         (14000, -0.5), (16000, -13)]
# colour of packed grains scraping: freq_hz, level_db
SCRAPE = [(100, -10), (280, -1), (500, -3.5), (750, 3), (1050, -2), (1600, -5), (4000, -19)]
# low modes of the hand-damped plate, before the shift: freq_hz, t60_s (before the cap), level_db
PLATE_LOW = [(1250, 0.04, 3), (774, 0.02, -13)]
# its high modes, before the shift: freq_hz, t60_s (before the cap), level_db
PLATE_HIGH = [(2287, 0.03, 4.5), (2530, 0.018, -1), (3700, 0.012, -5), (3860, 0.018, 1)]
# both resonances shift as the cupped fingers travel round the plate: time_s, low_hz, high_hz
PLATE_SHIFT = [(5.758, 1183, 2397), (5.83, 1131, 2188), (5.889, 1130, 2305), (5.979, 1345, 2385),
               (6.049, 1279, 2295), (6.109, 1220, 2314), (6.36, 1289, 2375), (6.418, 1240, 2056),
               (6.62, 1158, 2430), (6.741, 1022, 2390), (6.87, 1153, 2420)]


def stir(hiss_db=1, low_db=0, high_db=0, scrape_db=0, catch_db=2.0, release_t60=0.15):
    """Grains catch and slip: fine ones hiss, a few crack, packed ones scrape, coarse ones ring a shifting plate."""
    hiss_gain, low_gain, high_gain, scrape_gain = (
        strokes(STIRS, attack_s=0.013, release_t60=release_t60, axis=2 + k) for k in range(4))
    fine = grains(per_s=5000, spread_db=2)
    cracks = undb(-4) * grains(per_s=200, spread_db=3)
    hiss = hiss_gain * colour(unit(fine + cracks), SPICE)
    scrape = scrape_gain * colour(grains(per_s=1500, spread_db=2), SCRAPE)
    coarse = grains(per_s=900, spread_db=3)
    times, low_hz, high_hz = np.transpose(PLATE_SHIFT)

    def plate(modes, path_hz):
        """The coarse grains ring these modes while their pitch moves along the path."""
        steady = unit(convolve(coarse, ring(modes)))
        return glide(steady, np.interp(TIME, times, path_hz) / modes[0][0])

    low = low_gain * plate(PLATE_LOW, low_hz)
    high = high_gain * plate(PLATE_HIGH, high_hz)
    catching = unit(undb(catch_db * walk(rate=90)))
    grain = undb(hiss_db) * hiss + undb(scrape_db) * scrape
    return catching * (grain + undb(low_db) * low + undb(high_db) * high)


# pinches of spice fall on the meat: start_s, length_s, level_db
PINCHES = [(6.885, 0.24, -71), (6.955, 0.017, -61.5), (7.04, 0.047, -61), (7.12, 0.041, -66),
           (7.19, 0.12, -69), (7.275, 0.079, -69.5), (7.36, 0.172, -73), (7.54, 0.092, -69),
           (7.63, 0.032, -75)]


def sprinkle(fall_db=1.5, uneven_db=2):
    """Fine powder patters down in short flurries of clicks; coarser flakes tick one by one."""
    powder = grains(per_s=3500, spread_db=3)
    flakes = undb(-4) * grains(per_s=110, spread_db=2.5)
    falling = unit((powder + flakes) * undb(uneven_db * walk(rate=120)))
    ticks = colour(falling, [(300, -24.5), (1500, -6.0), (3000, -2), (4800, -0.5),
                             (6500, 5.5), (12000, 4.0), (16000, -8)])  # freq_hz, level_db
    return undb(fall_db) * strokes(PINCHES, attack_s=0.014, release_t60=0.11) * ticks


# small things nearby scatter mostly the treble: freq_hz, level_db
SCATTER = [(60, -28), (300, -12), (600, -6), (1300, -7), (2000, -5), (3000, 1), (4600, 1), (7500, 0),
           (10000, -9), (13000, -1), (16000, -10)]


def reflections(x, near_db, near_t60):
    """Table and shelter scatter a short noise-like tail, different at each port and cut at each section."""
    out = np.zeros((2, N))
    pieces = np.split(x, [int(s * SR) for s in SECTION_STARTS[1:]])
    for port in out:
        tail = burst(SCATTER, near_t60, rise_s=0.0071)
        tail = tail / np.linalg.norm(tail)
        for s, piece in zip(SECTION_STARTS, pieces):
            add(port, s, convolve(piece, tail))
    return undb(near_db) * out


def diffuse_reflections(x, near_db=-16, count=4):
    """Several random tails, each wandering in gain, give friction a changing, diffuse stereo spread."""
    tails = (walk(rate=16) * reflections(x, near_db=0, near_t60=.03) for _ in range(count))
    return undb(near_db) * sum(tails)


def scene():
    """Handling close to the ports, the shaking table with its reflections, and the garden."""
    close = blows() + snaps() + taps() + rocking()
    friction = smear() + peel() + swish() + lean() + brush() + rustle() + stir() + sprinkle()
    table = shakes() + ring_out()
    scattered = reflections(close, near_db=-11.5, near_t60=.06)
    scattered += diffuse_reflections(friction)
    scattered += reflections(table, near_db=1.5, near_t60=0.03)
    return ports(close + friction + table) + scattered + outdoors()


TOP_HZ = 16200


def record(dry):
    """A steep elliptic low-pass removes the extreme treble."""
    low_pass = signal.ellip(10, .2, 95, TOP_HZ, fs=SR, output="sos")  # order, ripple dB, rejection dB
    return signal.sosfilt(low_pass, dry)


dry = scene()
out = record(dry)
generate_wav(out)
```